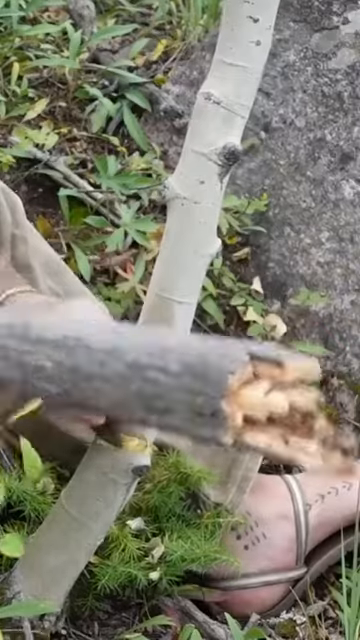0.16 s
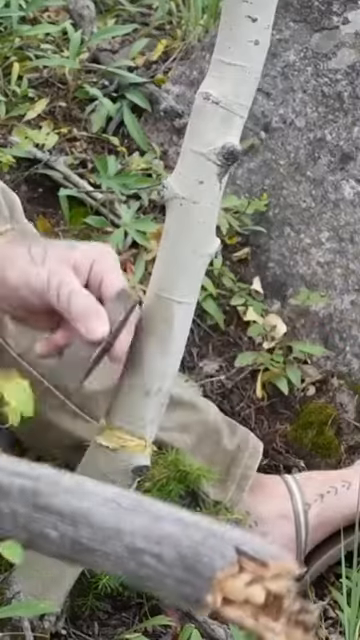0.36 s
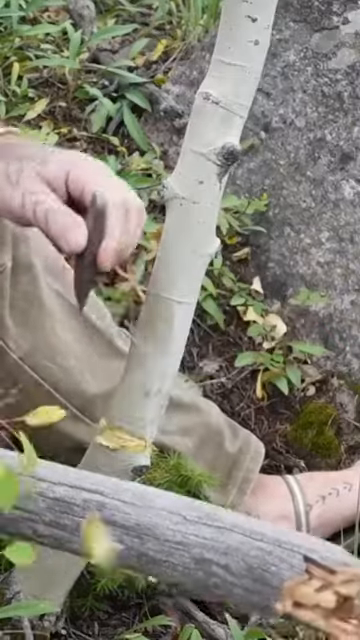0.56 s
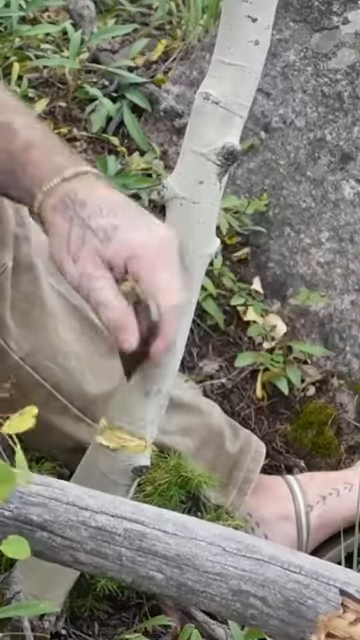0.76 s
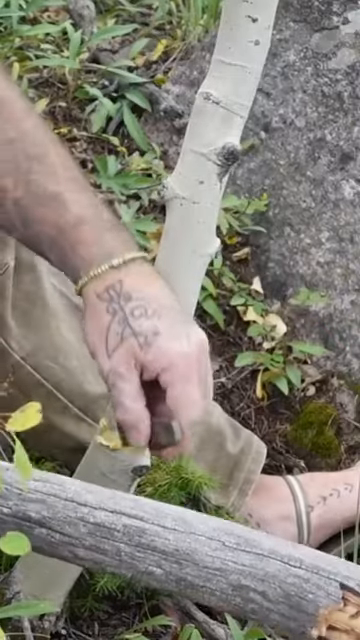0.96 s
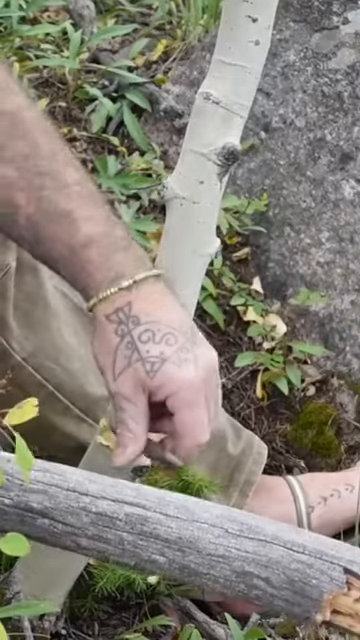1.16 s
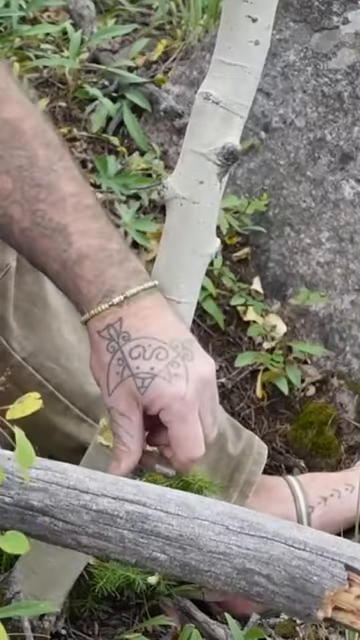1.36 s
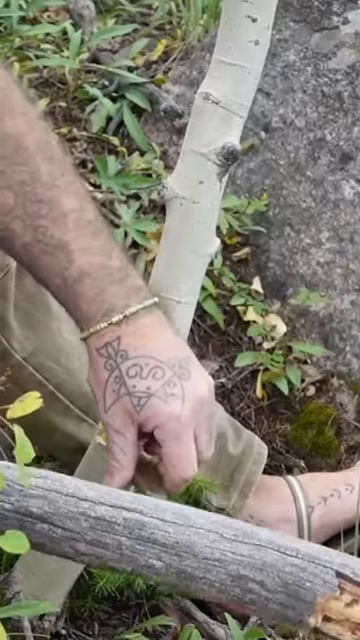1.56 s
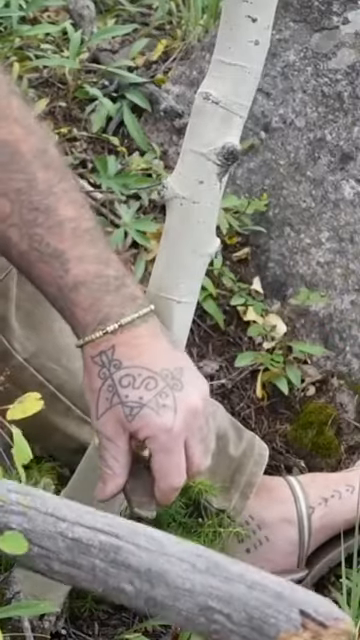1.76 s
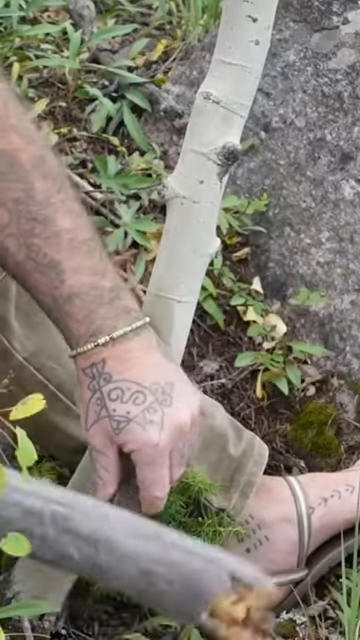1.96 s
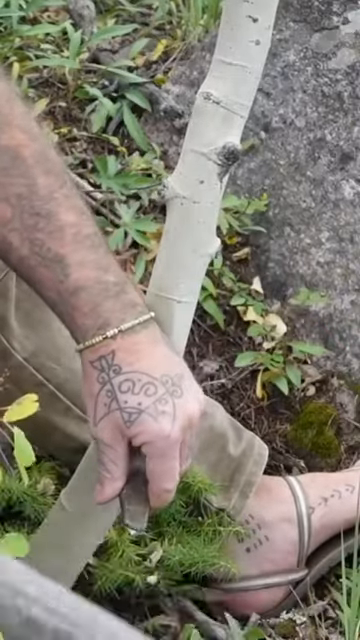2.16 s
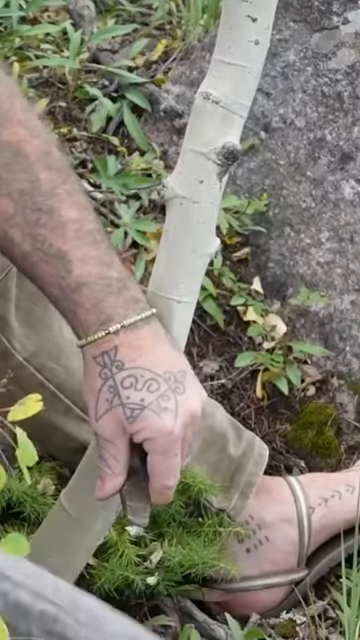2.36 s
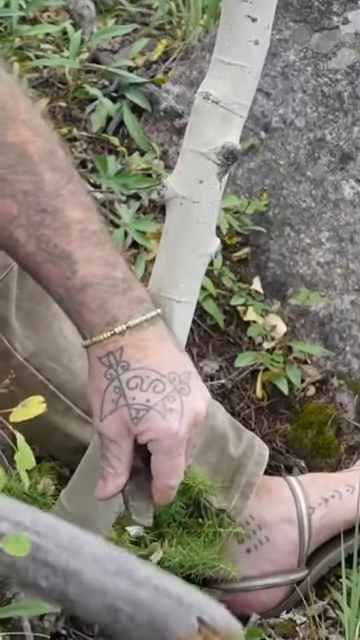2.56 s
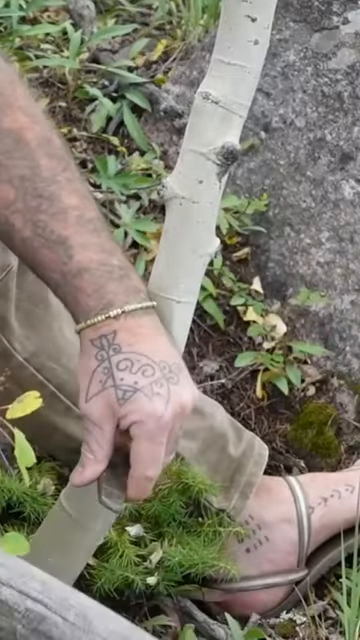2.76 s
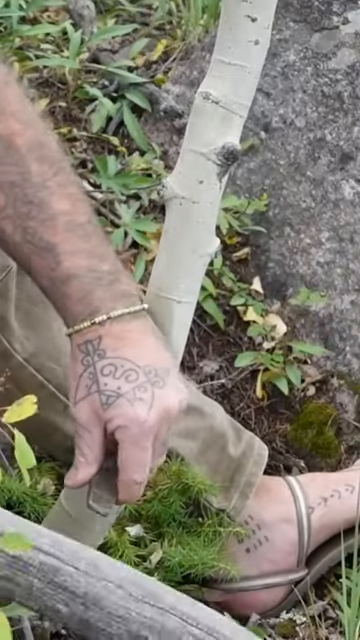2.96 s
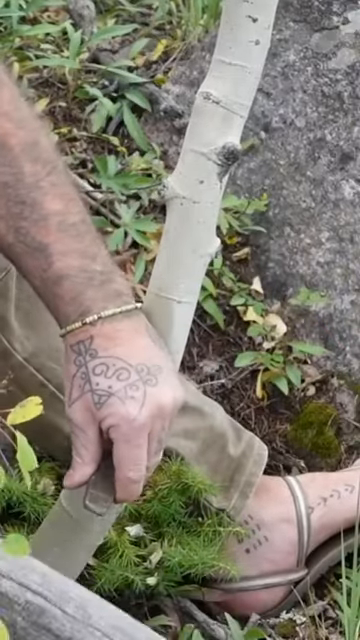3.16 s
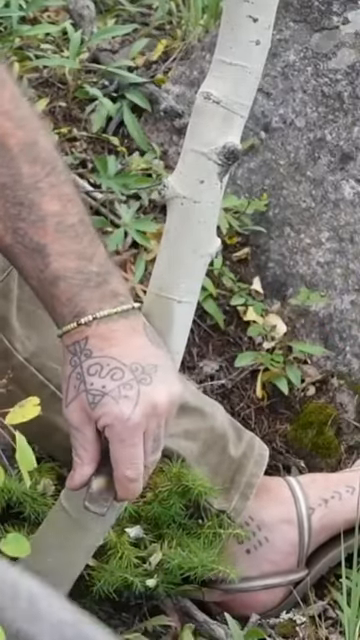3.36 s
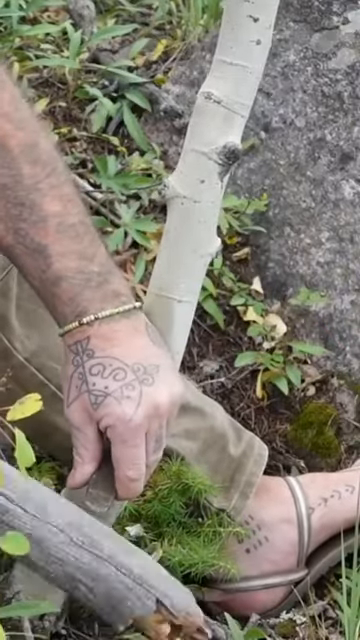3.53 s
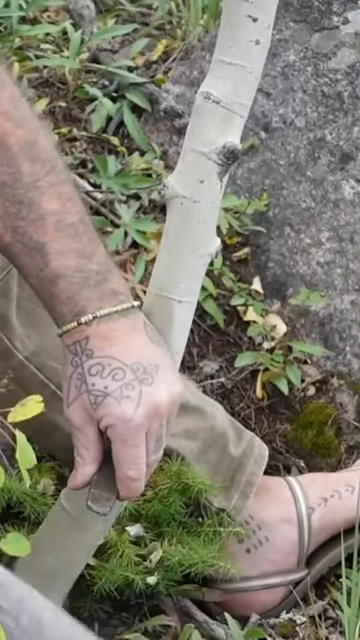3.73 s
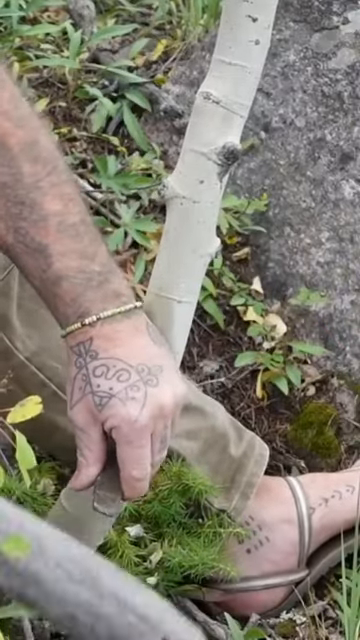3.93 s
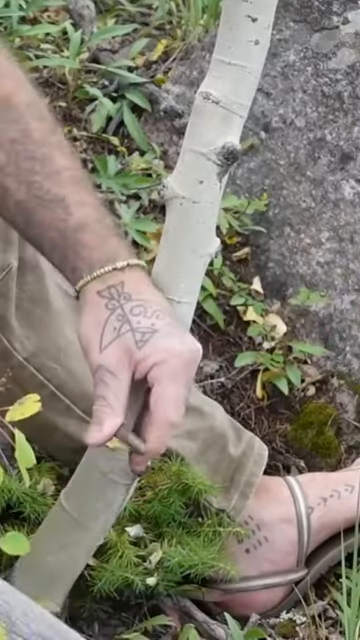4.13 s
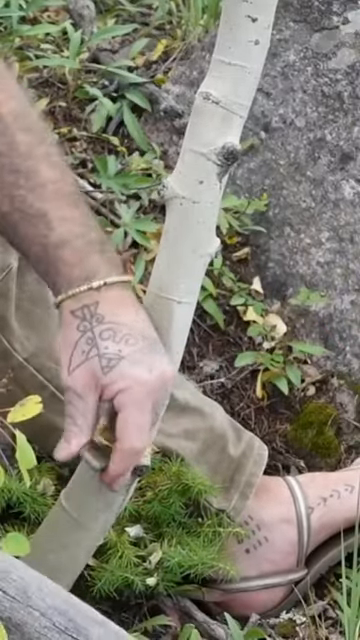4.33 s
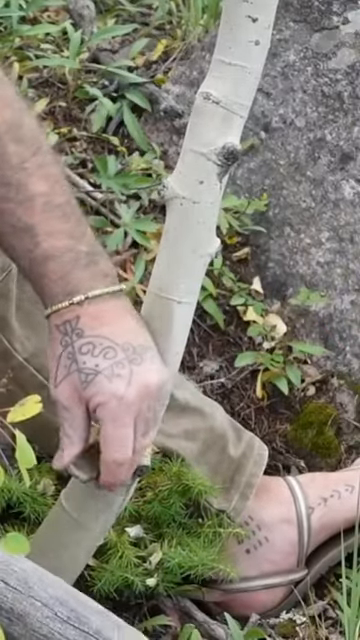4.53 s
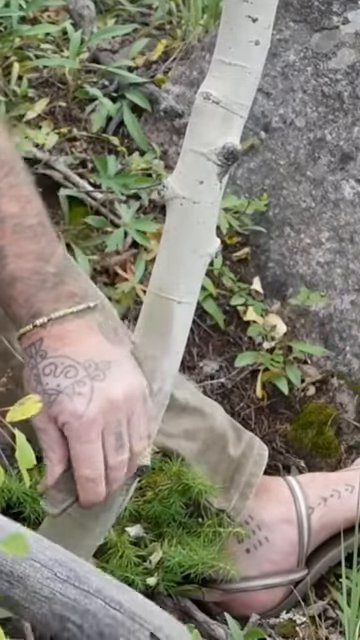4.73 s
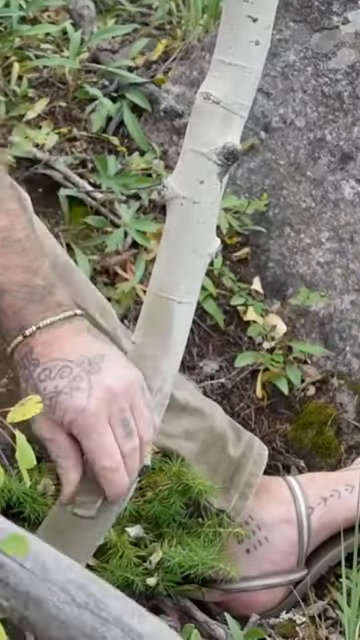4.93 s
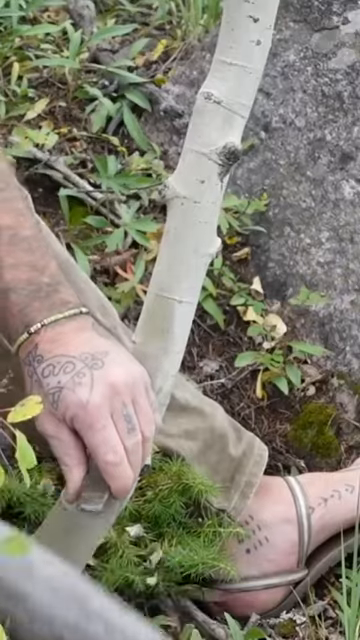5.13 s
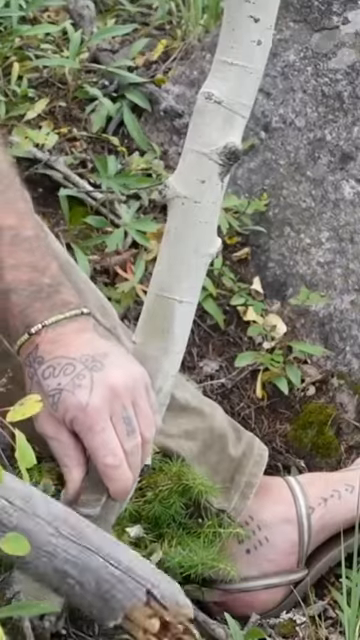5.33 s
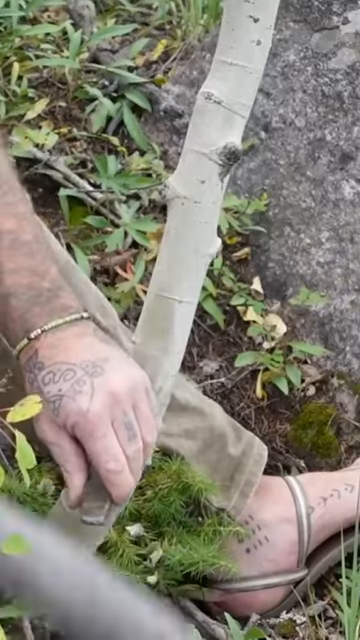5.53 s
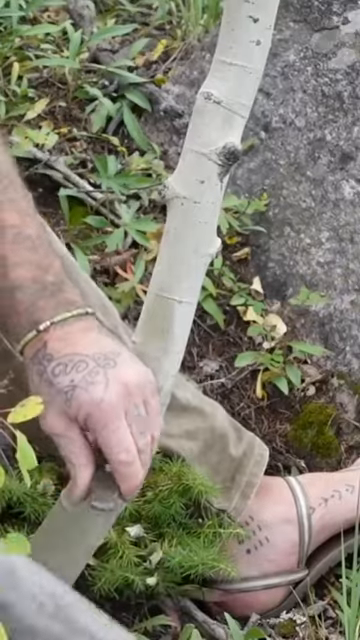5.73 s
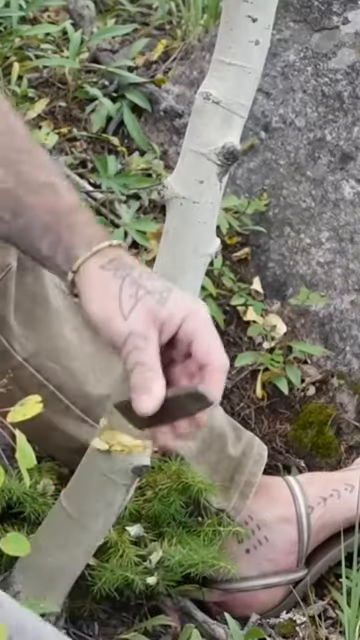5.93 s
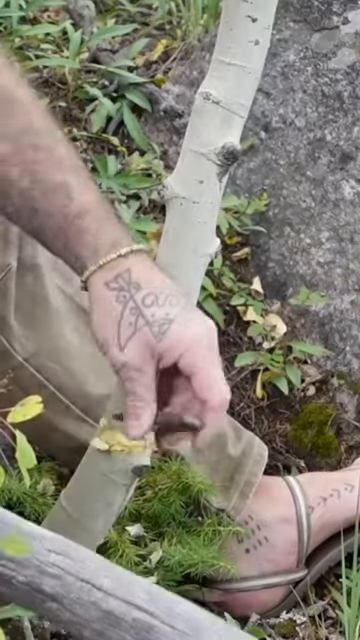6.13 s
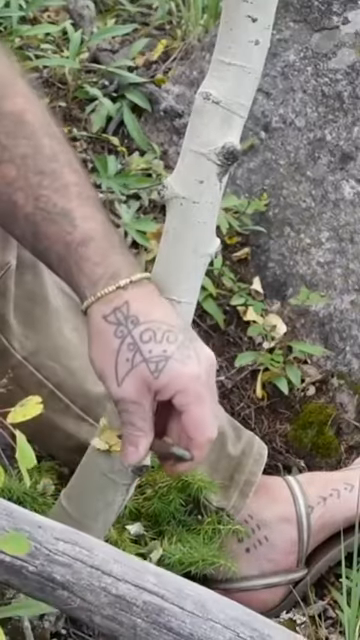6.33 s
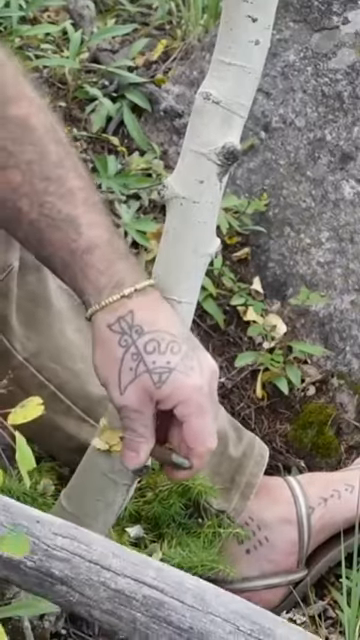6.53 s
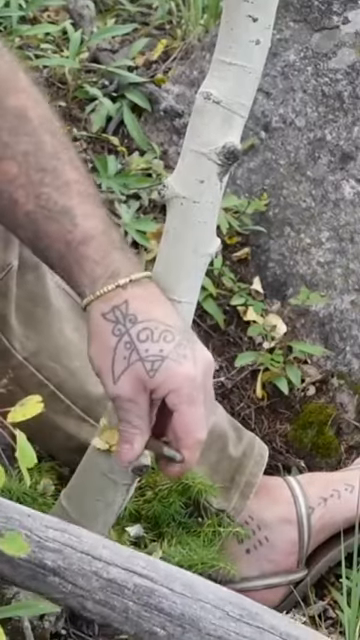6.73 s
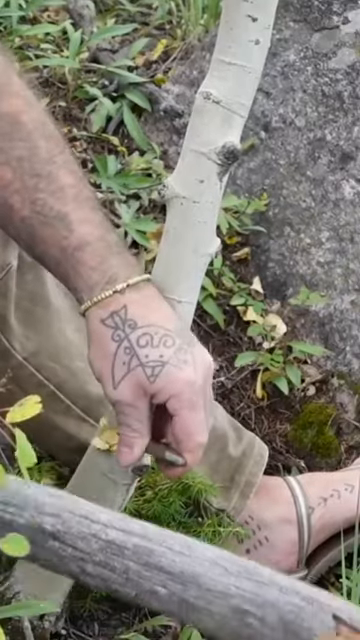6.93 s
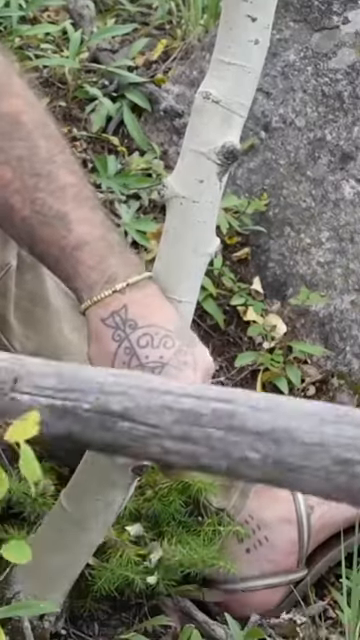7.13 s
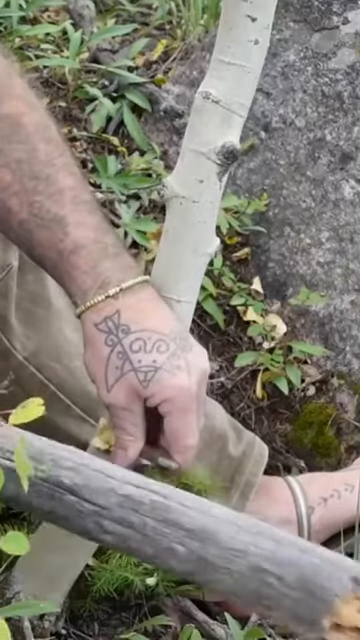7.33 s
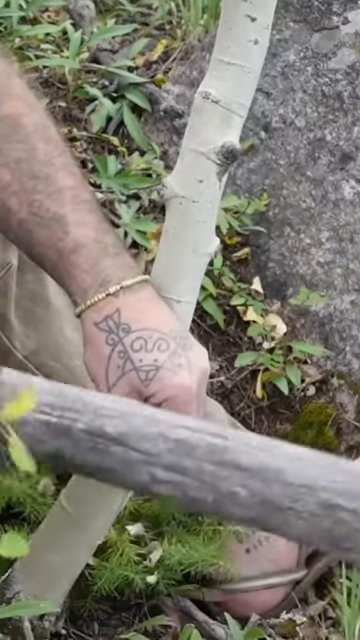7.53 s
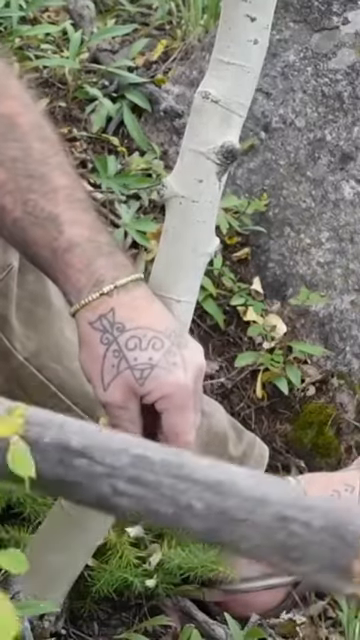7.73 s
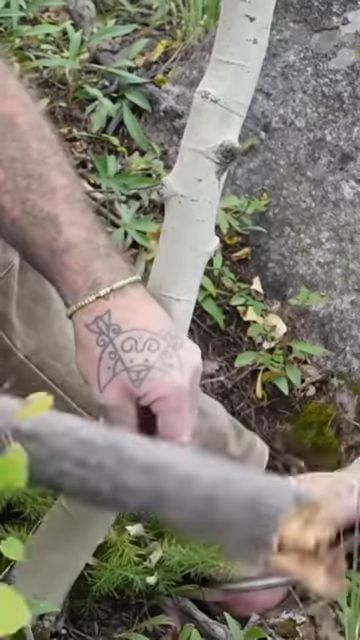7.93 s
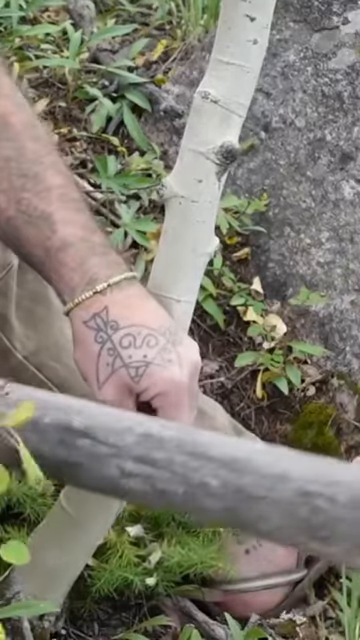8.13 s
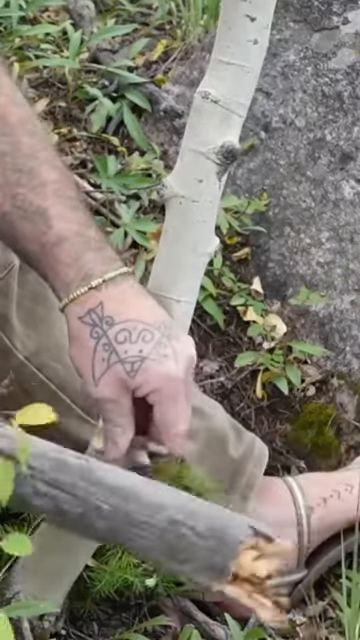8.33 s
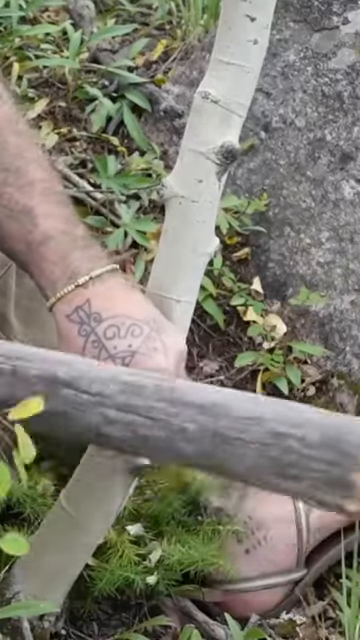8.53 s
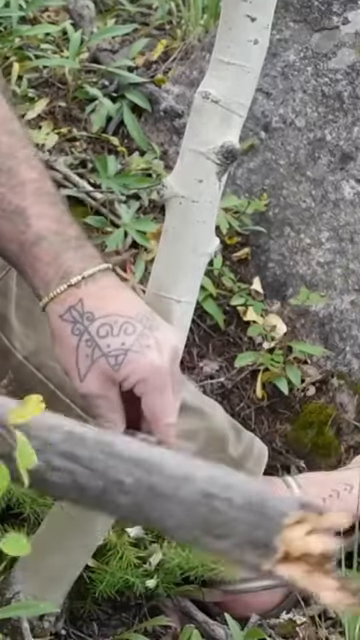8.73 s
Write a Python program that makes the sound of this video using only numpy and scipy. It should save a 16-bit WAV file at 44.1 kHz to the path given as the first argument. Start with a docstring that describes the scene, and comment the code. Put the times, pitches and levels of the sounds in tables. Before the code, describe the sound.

The sound opens on a few crisp splintering cracks in the first 0.2 seconds, with leaves still settling. Until 2 seconds there is only quiet outdoor air, a soft brush of sleeve on leaves near 0.7, tiny dry snaps and faint handling knocks around 1.0 to 1.4. Three hard club blows on the stone wedge follow at 2.05, 2.36 and 2.63, rising in force, then three at 3.37, 3.65 and 3.91, with brighter cracking. After a pause come three more at 5.12, 5.41 and 5.69, the last sharp and clicky. A short leafy brush passes at 6.2. Five blows run from 7.36 to 8.72, woodier and surrounded by dense splintering and rattling chips. Each is a short dry clack with a small low thump, tearing fibres and shaken leaves. Close, dry pickup; faint wind behind.

```python
"""Wooden club driving a stone wedge into a sapling

Outdoors, a dry wooden club hits a stone wedge at the foot of a sapling, in runs of quick blows.
Each blow is a click and a crunch that ring club, trunk and stone, with low waves for the ground thump.
Short noise bursts make cracking fibres and bark, the rattling wedge and dropping chips.
Grainy noise makes tearing fibres, leaves and the sleeve; ticks and soft knocks come from handling.
Smooth coloured noise makes the far air and a little wind.
"""
import sys
import numpy as np
from scipy import signal
from scipy.fft import rfft, irfft, next_fast_len
from scipy.io import wavfile

SR = 44100
rng = np.random.default_rng(int(sys.argv[2]) if len(sys.argv) > 2 else 0)


def put_to_file(sound):
    """Save the sound as 16-bit audio at rate SR, in the file named by the first command-line argument."""
    columns = np.atleast_2d(sound).T  # one column per channel
    safe = np.clip(columns, -1, 1)
    whole_steps = np.round(safe * 32767)
    wavfile.write(sys.argv[1], SR, whole_steps.astype(np.int16))


N = 387620   # length [samples]

# Far air: (frequency [Hz], level [dB per Hz]), before the bands below are raised or lowered
FAR_SPECTRUM = [(59, -20), (100, -15.5), (229, 0), (255, -1), (302, -3.5), (471, -4.5), (535, -7),
                (736, -7), (1150, -10.5), (1830, -10), (2990, -15), (4020, -29), (4670, -25), (7140, -34),
                (16000, -22)]
# Bands standing out of the far air or sunk into it: (centre [Hz], width [Hz], change [dB])
FAR_BANDS = [(666, 75, 5), (1470, 150, 5.5), (1910, 140, -0.5), (2340, 110, 10.5), (4720, 150, -13)]
# How alike the far air is on left and right: (frequency [Hz], likeness [0 to 1])
FAR_LIKENESS = [(60, 0.37), (150, 0.57), (380, 0.8), (950, 0.49), (2380, 0.89), (5980, 0.67), (15000, 1.0)]
# Wind noise: (frequency [Hz], level [dB per Hz])
WIND_SPECTRUM = [(15, -59), (25, -54), (51, -10.5), (103, 3), (216, -3.5), (257, -8.5), (356, -17),
                 (400, -11), (520, -42), (880, -120)]
# Wind coming and going: (time [s], level [dB])
WIND_LEVEL = [(0, -48), (0.06, -66), (0.4, -76), (1.4, -78), (3.0, -73), (4.4, -77), (4.95, -70),
              (5.2, -62), (5.5, -69), (6.4, -65.5), (7.2, -62), (7.6, -61), (8.2, -58), (8.79, -66)]
# Rustle of the shaken leaves: (frequency [Hz], level [dB per Hz])
LEAF_SPECTRUM = [(200, -36), (500, -7.5), (1200, -3), (2300, -1.5), (5000, -1.5), (9900, -8), (16000, -25)]
# Cracking fibres, rattling wedge, dropping chips:
# (time [s], level [dB], pitch [Hz], time to fall 60 dB [s], share ringing the wood and stone [dB])
CRACKS = [(0.0126, -17.5, 5150, 0.065, -15), (0.0207, -12.5, 5600, 0.03, -26),
          (0.045, -19.5, 5060, 0.068, -22), (0.1401, -25, 4000, 0.058, -20), (0.1865, -33, 2340, 0.04, -16),
          (0.3885, -38, 5540, 0.077, -10), (0.4066, -37, 10300, 0.035, -28),
          (0.712, -32.5, 5900, 0.11, -16), (1.1248, -40.5, 2520, 0.044, -23),
          (1.3416, -47, 3040, 0.072, -18), (1.9967, -45, 4800, 0.06, -8), (2.0905, -22, 5260, 0.04, -27),
          (2.1224, -22, 3200, 0.025, -19), (2.168, -35, 3560, 0.12, -8), (2.2002, -38.5, 5830, 0.12, -1),
          (2.4077, -28.5, 3200, 0.12, -13), (2.4274, -29, 7300, 0.03, -20),
          (2.4438, -30.5, 5130, 0.12, -7.5), (2.593, -40, 5280, 0.04, -10), (2.612, -43, 3500, 0.06, -12),
          (2.6808, -21, 5200, 0.091, -11.5), (2.7188, -21.5, 5150, 0.098, -11),
          (2.7691, -34, 2530, 0.05, -12), (2.947, -41, 4500, 0.04, -16), (3.3313, -40.5, 2320, 0.036, -9),
          (3.4147, -21, 5050, 0.052, -11), (3.4364, -26.5, 5540, 0.07, -6),
          (3.461, -31.5, 4820, 0.09, -5.5), (3.4985, -36, 1850, 0.054, -16), (3.5146, -30, 4660, 0.12, -3),
          (3.5369, -17.5, 2600, 0.035, -8), (3.671, -23, 7270, 0.03, -12),
          (3.695, -16.5, 5600, 0.049, -14.5), (3.7142, -23.5, 3550, 0.04, -16),
          (3.7332, -23, 5410, 0.026, -19), (3.7414, -26, 5440, 0.031, -12), (3.805, -26, 4220, 0.053, -10),
          (3.96, -16, 5260, 0.04, -16.5), (3.9773, -26, 4880, 0.021, -17),
          (3.9965, -20, 6740, 0.028, -11.5), (4.0051, -24, 6850, 0.047, -6),
          (4.0196, -26, 3730, 0.04, -14.5), (4.084, -37, 6500, 0.042, -7), (4.348, -44.5, 2330, 0.044, -4),
          (5.1699, -23.5, 5030, 0.093, -12), (5.2111, -35, 4930, 0.066, -9),
          (5.4638, -20.5, 5240, 0.086, -11), (5.5043, -24.5, 5130, 0.042, -23),
          (5.5448, -36, 4310, 0.05, -14), (5.7018, -15, 7400, 0.04, -18), (5.7104, -20, 7250, 0.055, -23),
          (5.7335, -22.5, 5550, 0.075, -26), (5.7713, -32, 8700, 0.064, -13),
          (5.7806, -26.5, 6000, 0.044, -11), (5.8262, -32.5, 4430, 0.055, -12),
          (6.3621, -33, 3070, 0.06, -22), (6.761, -42.5, 6300, 0.044, -25), (7.4442, -24, 5100, 0.12, -11),
          (7.503, -36.5, 5060, 0.12, -5), (7.5462, -36, 5240, 0.08, -8), (7.661, -34.5, 7300, 0.11, -22),
          (7.712, -40, 8000, 0.05, -25), (7.7456, -11.5, 5160, 0.03, -29), (7.7586, -14, 6850, 0.063, -14),
          (7.7812, -17, 4540, 0.079, -12.5), (7.8118, -21, 5140, 0.04, -25),
          (7.8276, -20, 4350, 0.036, -20), (7.9098, -28.5, 4760, 0.032, -13.5),
          (8.0687, -16, 4480, 0.04, -20), (8.0773, -15, 6100, 0.02, -25), (8.0888, -19, 7250, 0.049, -23),
          (8.0983, -19.5, 5940, 0.044, -25), (8.1331, -17.5, 5090, 0.04, -14.5),
          (8.1562, -11.5, 7060, 0.024, -36), (8.1624, -20, 2070, 0.04, -12),
          (8.2512, -35, 7340, 0.055, -21), (8.414, -10, 5030, 0.048, -24), (8.4337, -18, 5140, 0.04, -24),
          (8.4447, -14.5, 5070, 0.079, -15), (8.4782, -20, 5200, 0.053, -27),
          (8.5038, -18, 7000, 0.04, -13), (8.542, -28, 5070, 0.04, -16), (8.5739, -34, 6460, 0.04, -17),
          (8.588, -32, 5030, 0.029, -13), (8.6042, -35, 6350, 0.04, -15), (8.6824, -25.5, 6250, 0.016, -35),
          (8.7, -36, 6500, 0.05, -22), (8.7394, -19, 7260, 0.052, -17), (8.7603, -23.5, 5160, 0.068, -30),
          (8.778, -23, 4200, 0.033, -13)]
# Notes of trunk, club and stone, ringing together:
# (pitch [Hz], level [dB], time to fall 60 dB [s], body [0 trunk, 1 club, 2 stone])
BODY_NOTES = [(324, -2, 0.013, 0), (460, -7, 0.063, 0), (588.5, 0.5, 0.03, 0), (828, 0, 0.029, 0),
              (1041, -5.5, 0.018, 1), (1178, -1.5, 0.024, 1), (1406, -2.5, 0.022, 1),
              (1765, 1.5, 0.0056, 1), (2310, 4, 0.018, 2), (2990, 12, 0.0041, 2), (3896, 7, 0.0049, 2),
              (4860, 1, 0.02, 2), (5990, -3.5, 0.018, 2), (7340, 1.5, 0.0057, 2)]
# Sleeve against leaves: (frequency [Hz], level [dB per Hz])
SLEEVE_SPECTRUM = [(530, -57), (900, -20), (1040, -19), (1160, -11), (1750, -5.5), (2040, -4), (2360, -5),
                   (4520, -1), (10600, -10), (16000, -24)]
# Arm and sleeve brushing through leaves: (crest time [s], level [dB], rise [dB/s], fall [dB/s])
STROKES = [(0.72, -50, 30, 48), (1.72, -62, 100, 25), (6.224, -45, 55, 120), (7.34, -59, 45, 150)]
# Dry bark and needles snapping under the hand: (time [s], peak [dB], pitch [Hz])
SNAPS = [(0.976, -46.5, 7930), (1.0036, -51, 7350), (1.1304, -46, 9200), (1.1682, -48, 8540),
         (1.148, -52, 1000), (1.3698, -52, 5110), (1.3877, -47.5, 7610)]
# Small dull knocks of handled wood: (time [s], peak [dB], pitch [Hz], time to fall 60 dB [s])
KNOCKS = [(1.041, -51, 854, 0.042), (1.124, -55, 990, 0.056), (2.21, -40.5, 590, 0.027),
          (2.51, -44, 580, 0.021), (4.535, -57, 207, 0.039), (7.291, -46.5, 430, 0.089)]
# Club on wedge: (time [s], knock peak [dB], trunk over stone [dB], club over stone [dB],
# direct click [dB], ground thump [dB], tearing [dB], time for tearing to fall 60 dB [s], leaf shake [dB])
BLOWS = [(2.052, -11.5, -1, 6, -23, -32, -31, 0.25, -55), (2.3605, -8.5, -6, 7, -20, -31, -26.5, 0.11, -54),
         (2.6343, -6, -2.5, 5, -25, -32.5, -20.5, 0.1, -49),
         (3.366, -9.5, 1, 8, -37, -30.5, -24.5, 0.089, -49.5),
         (3.6462, -7, -2, 7.7, -22, -32.5, -19.5, 0.076, -52),
         (3.9128, -4.5, -3, 3, -12.5, -31, -27.5, 0.17, -51),
         (5.1225, -11.5, -1.2, 5.3, -19, -32, -29.5, 0.086, -54),
         (5.4146, -6, -3.3, 3.2, -25, -30, -21.5, 0.07, -52),
         (5.688, -4.5, -6.5, 3.5, 0.4, -33, -30.5, 0.27, -49),
         (7.3617, -9.9, 6.5, 8.3, -6, -28.5, -27.5, 0.27, -50),
         (7.7229, -9.5, 4.5, 3.8, -9, -29.5, -25.5, 0.23, -48),
         (8.0525, -8.9, 4.3, 7, -10, -27.5, -22, 0.18, -45),
         (8.3995, -7, 5.7, 7.5, -10, -28.5, -24.5, 0.23, -48),
         (8.7164, -5, 0.3, 3.3, -13, -30, -26, 0.27, -45)]
# Low waves in the soil, the lowest swelling latest: (pitch [Hz], level [dB], time to crest [s])
GROUND_WAVES = [(310, -4.5, 0.0024), (227.8, 8.5, 0.0075), (163.4, 3.5, 0.017), (119.6, -2, 0.026),
                (85.5, -7.5, 0.04)]
# Tearing fibres: (frequency [Hz], level [dB per Hz])
TEARING_SPECTRUM = [(120, -30), (200, -2), (519, -15), (623, -12), (806, -18), (1160, -10), (2090, -13),
                    (4950, -12), (5420, -11.5), (12400, -28), (14900, -48), (16000, -62)]
# Returns from ground and rock: (delay [s], level [dB])
RETURNS = [(.00155, -16.5), (.0031, -14), (.0056, -17.5)]

FAR_DB, STILL_LEAVES_DB = -64.5, -68
EARLIER_BLOW_S, EARLIER_SHAKE_DB = -0.06, -45   # leaves still rustle from a blow just before the start
SHAKE_CREST_S, SHAKE_NARROW = 0.105, 1.95   # a higher power makes the swell narrower
SETTLE_DB, SETTLE_T60_S = -5, 1.5   # slower settling under the swell, relative to the shake
# Random snaps after every blow
SNAPS_PER_BLOW, SNAP_WAIT_S, SNAP_SPREAD_S = 6, 0.012, 0.07
SNAP_OVER_LEAVES_DB, SNAP_FADE_DB_PER_S = 18, 60
SNAP_LOW_HZ, SNAP_HIGH_HZ = 4700, 7000
CUTOFF_HZ = 16600


def from_db(db):
    """Turn a level in dB into a gain."""
    return 10 ** (np.asarray(db) / 20)


def rms_one(x):
    """Scale to an average strength (rms) of 1."""
    return x / np.sqrt(np.mean(x ** 2) + 1e-20)


def peak_one(x):
    """Scale so the highest peak is 1."""
    return x / np.max(np.abs(x))


def add(out, s, x):
    """Mix a short sound in at time s."""
    i = round(s * SR)
    out[i:i + len(x)] += x[:N - i]


def bandpass(x, order, low_hz, high_hz):
    """Keep mainly what lies between two frequencies."""
    return signal.sosfilt(signal.butter(order, [low_hz, high_hz], "band", fs=SR, output="sos"), x)


def at_hz(points, hz):
    """Read a table between its points, on a log-frequency axis."""
    table = np.array(points)
    return np.interp(np.log(hz), np.log(table[:, 0]), table[:, 1])


def drift(rate_hz):
    """Slow random wandering with rms 1, computed at every 40th sample and joined by lines."""
    r = np.exp(-80 * np.pi * rate_hz / SR)
    chance = rng.standard_normal(N // 40 + 2002)
    slow = signal.lfilter([1], [1, -2 * r, r * r], chance)[2000:]   # skip the filter's start
    return np.interp(np.arange(N) / 40, np.arange(len(slow)), rms_one(slow))


def coloured(x, spectrum):
    """Shape noise or grains by a table of levels over frequency, with rms 1."""
    size = next_fast_len(N)
    hz = np.maximum(np.arange(size // 2 + 1) * SR / size, 1)
    shaped = rfft(x, size) * from_db(at_hz(spectrum, hz))
    return rms_one(irfft(shaped, size)[..., :N])


def grains(per_s, spread_db, bed):
    """Random clicks of uneven size on a bed of smooth noise."""
    sizes_db = spread_db * np.minimum(rng.exponential(1, N), 4)
    sizes = from_db(sizes_db) * rng.choice([-1, 1], N)
    clicks = sizes * (rng.random(N) < per_s / SR)
    return rms_one(clicks) + bed * rng.standard_normal(N)


def lifted(x, bands):
    """Raise or lower a few bands against the rest."""
    size = next_fast_len(N)
    hz = np.arange(size // 2 + 1) * SR / size
    lift_db = sum(db / (1 + (2 * (hz - centre_hz) / width_hz) ** 2) for centre_hz, width_hz, db in bands)
    return irfft(rfft(x, size) * from_db(lift_db), size)[..., :N]


def surroundings():
    """Far air and wind: shared noise plus a second noise, flipped between sides, to make them differ."""
    sides = np.array([[1], [-1]])
    apart = [(hz, 10 * np.log10((1 - min(c, .99)) / (1 + c))) for hz, c in FAR_LIKENESS]
    far_side_spectrum = [(hz, db + at_hz(apart, hz)) for hz, db in FAR_SPECTRUM]
    far_middle = coloured(rng.standard_normal(N), FAR_SPECTRUM)
    far_side = coloured(rng.standard_normal(N), far_side_spectrum)
    far = lifted(far_middle + from_db(-4) * sides * far_side, FAR_BANDS)
    wind_middle = coloured(rng.standard_normal(N), WIND_SPECTRUM)
    wind_side = coloured(rng.standard_normal(N), WIND_SPECTRUM)
    wind = wind_middle + from_db(-11) * sides * wind_side
    wind_db = np.interp(np.arange(N) / SR, *np.transpose(WIND_LEVEL))
    gusts = from_db(wind_db + 3.0 * drift(6.4))
    return from_db(FAR_DB + 0.97 * drift(2.3)) * far + gusts * wind


def leaves():
    """Every blow shakes the sapling: a grainy rustle swells, dies and settles."""
    t = np.arange(0, N + 64, 64) / SR   # a coarse clock is enough for loudness
    power = from_db(STILL_LEAVES_DB) ** 2
    shakes = [(EARLIER_BLOW_S, EARLIER_SHAKE_DB)] + [(row[0], row[-1]) for row in BLOWS]
    for s, db in shakes:
        since = np.maximum(t - s, 0)
        swell = (since / SHAKE_CREST_S * np.exp(1 - since / SHAKE_CREST_S)) ** SHAKE_NARROW
        settle = from_db(SETTLE_DB - 60 * since / SETTLE_T60_S) * (1 - np.exp(-since / SHAKE_CREST_S))
        power = power + from_db(db) ** 2 * (swell ** 2 + settle ** 2)
    gain = np.interp(np.arange(N) / SR, t, np.sqrt(power))
    rustle = coloured(grains(3000, 1.7, bed=1.0), LEAF_SPECTRUM)
    return gain * from_db(1.4 * drift(30)) * rustle


def ring(x, hz, t60):
    """Resonance: a unit click sets a dying sine of starting height 1 ringing."""
    r, w = from_db(-60 / (t60 * SR)), 2 * np.pi * hz / SR
    return signal.lfilter([0, np.sin(w)], [1, -2 * r * np.cos(w), r * r], x + 1e-18)


def ring_bodies(push, extra_db, stretch):
    """One push rings all notes of trunk, club and stone, with alternating signs and adjustable pitch."""
    out = 0
    for k, (hz, db, t60, body) in enumerate(BODY_NOTES):
        out = out + (-1) ** k * from_db(db + extra_db[k]) * ring(push, hz * stretch[k], t60)
    return out


def cracks():
    """A sharp click and a dying, lumpy spray in a broad band; part of it rings the club, stone and trunk."""
    out, t = np.zeros(N), np.arange(SR // 8) / SR
    noise = rng.standard_normal((len(CRACKS), 2, len(t)))
    bodies = [int(note[-1]) for note in BODY_NOTES]
    reach_db = np.array([-12, 6, -4])[bodies]   # trunk, club, stone
    for (s, db, hz, t60, ring_db), (spray, lumps) in zip(CRACKS, noise):
        lumpy = from_db(3.5 * rms_one(signal.lfilter([1], [1, -.97], lumps)))
        burst = spray * lumpy * from_db(-60 * t / t60)
        burst[0] += 7.0   # the sharp click
        bright = peak_one(bandpass(burst, 1, hz / 1.08, min(hz * 1.38, .45 * SR)))
        bright = bright + .38 * peak_one(ring(burst, hz, 0.0056))   # the splinter's own note
        bright = peak_one(signal.sosfilt(signal.butter(2, 10500, fs=SR, output="sos"), bright))
        strength_db = reach_db + 2 * lumps[-len(BODY_NOTES):]   # reuse some noise as luck
        rung = ring_bodies(burst, strength_db, np.ones(len(BODY_NOTES)))
        add(out, s, from_db(db) * (bright + from_db(ring_db) * peak_one(rung)))
    return out


def brushing():
    """Dense leafy grains swell and fade with the arm's movement."""
    t = np.arange(N) / SR
    gain = sum(from_db(db - np.maximum(rise * (s - t), fall * (t - s))) for s, db, rise, fall in STROKES)
    leafy = coloured(grains(2500, 3.2, bed=0.7), SLEEVE_SPECTRUM)
    return gain * from_db(1.5 * drift(40)) * leafy


def loose_snaps():
    """Scatter snaps at random after each blow, later ones tending fainter, low pitches more likely."""
    rows = []
    for blow, luck in zip(BLOWS, rng.random((len(BLOWS), SNAPS_PER_BLOW, 3))):
        for when, size, pitch in luck:
            wait = SNAP_WAIT_S - SNAP_SPREAD_S * np.log(1 - when)
            db = blow[-1] + SNAP_OVER_LEAVES_DB - SNAP_FADE_DB_PER_S * wait - 8.0 * size
            hz = SNAP_LOW_HZ * (SNAP_HIGH_HZ / SNAP_LOW_HZ) ** pitch ** 2
            rows.append((blow[0] + wait, db, hz))
    return [row for row in rows if row[0] < N / SR]


def snaps():
    """Each snap is a fast-dying tick of noise, under an octave wide."""
    out, t = np.zeros(N), np.arange(SR // 40) / SR
    rows = SNAPS + loose_snaps()
    sprays = rng.standard_normal((len(rows), len(t)))
    for (s, db, hz), spray in zip(rows, sprays):
        dying = spray * from_db(-60 * t / 0.0078)
        tick = bandpass(dying, 2, hz / 1.06, min(hz * 1.21, .45 * SR))
        add(out, s, from_db(db) * peak_one(tick))
    return out


def knocks():
    """A soft contact and its rebound 3 ms later ring a low note and its overtone."""
    out, push = np.zeros(N), np.zeros(SR // 5)
    push[:40] = np.hanning(40)
    push = np.convolve(push, [1] + [0] * 130 + [.6])   # add the weaker rebound
    for s, db, hz, t60 in KNOCKS:
        knock = ring(push, hz, t60) - 0.4 * ring(push, 1.58 * hz, t60)
        add(out, s, from_db(db) * peak_one(knock))
    return out


def thump(t, rumble):
    """Low soil waves sink a little in pitch, each swelling and dying in its own time, over some rumble."""
    out = 0
    for (hz, db, crest_s), noise in zip(GROUND_WAVES, rumble):
        tune, strength, start = noise[:3]
        sinking_hz = hz * (1 + 0.056 * tune) * (1 + 0.15 * np.exp(-t / crest_s))
        turns = np.cumsum(sinking_hz) / SR
        low_noise = rms_one(bandpass(noise, 2, hz / 1.25, hz * 1.18))
        wave = np.sin(2 * np.pi * turns + 2 * start) + 0.46 * low_noise
        swell = (t / crest_s * np.exp(1 - t / crest_s)) ** 2.5
        out = out + from_db(db + strength) * wave * swell
    return peak_one(out)


def blows():
    """A click and brief crunch as the wedge bites ring all bodies; then the soil thumps and fibres tear."""
    out, tearing = np.zeros((2, N))
    t = np.arange(SR // 4) / SR
    bodies = [int(note[-1]) for note in BODY_NOTES]
    luck = rng.standard_normal((len(BLOWS), 2, len(BODY_NOTES)))
    noises = rng.standard_normal((len(BLOWS), 1 + len(GROUND_WAVES), len(t)))
    for row, (strength, tune), (crunch, *rumble) in zip(BLOWS, luck, noises):
        s, db, trunk_db, club_db, click_db, thump_db, tear_db, tear_t60, shake_db = row
        push = .1 * crunch * np.exp(-t / .001)
        push[0] = 1   # the click
        extra_db = np.array([trunk_db, club_db, 0])[bodies] + strength
        # each note's pitch varies a little at random
        rung = peak_one(ring_bodies(push, extra_db, 1 + .02 * tune))
        click = from_db(click_db) * peak_one(bandpass(push, 1, 1500, 8000))
        add(out, s, from_db(db) * peak_one(rung + click))
        add(out, s - .004, from_db(db - 28) * rung)   # a faint copy of the ring 4 ms before the blow
        add(out, s, from_db(thump_db) * thump(t, rumble))
        add(tearing, s, from_db(tear_db - 60 * t / tear_t60) * (1 - np.exp(-t / 0.0064)))
    fibres = coloured(grains(5000, 2.5, bed=.6), TEARING_SPECTRUM)
    return out + tearing * fibres * from_db(2 * drift(69))


def with_returns(x):
    """The direct sound and its duller returns from hard surfaces close by."""
    out = x.copy()
    dull = signal.sosfilt(signal.butter(1, 8000, fs=SR, output="sos"), x)
    for delay_s, db in RETURNS:
        add(out, delay_s, from_db(db) * dull)
    return out


def widening_tail(x):
    """A weak, thin, fast-dying noise tail, opposite in sign on the two sides, widens the near sounds."""
    t = np.arange(SR // 25) / SR
    dying_noise = rng.standard_normal(len(t)) * from_db(-60 * t / .03)
    tail = signal.fftconvolve(x, dying_noise / np.sqrt(np.sum(dying_noise ** 2)))[:N]
    tail = signal.sosfilt(signal.butter(1, 400, "high", fs=SR, output="sos"), tail)
    return from_db(-23) * tail * np.array([[1], [-1]])


def scene():
    """Work at the tree in the centre, air around it."""
    hard_sounds = cracks() + snaps() + knocks() + blows()
    near = with_returns(hard_sounds) + leaves() + brushing()
    return near + widening_tail(near) + surroundings()


def record(dry):
    """The lowest bass is cut, the peaks are rounded, the top is cut."""
    thin = signal.sosfilt(signal.butter(2, 50, "high", fs=SR, output="sos"), dry)
    rounded = .6 * np.tanh(thin / .6)
    return signal.sosfilt(signal.cheby2(14, 60, CUTOFF_HZ, fs=SR, output="sos"), rounded)


dry = scene()
out = record(dry)
put_to_file(out)
```